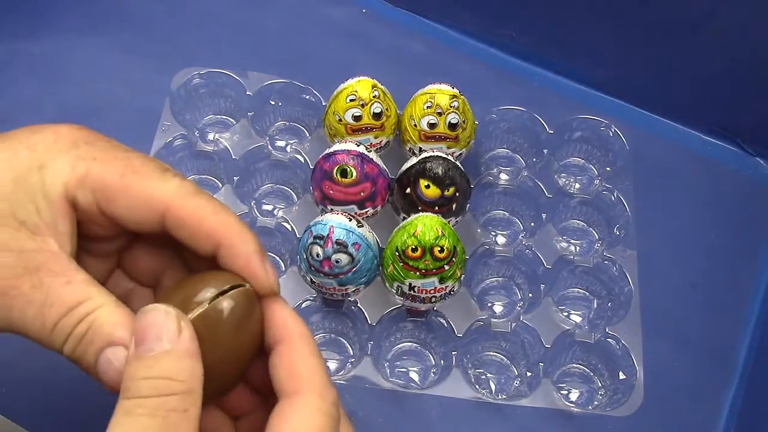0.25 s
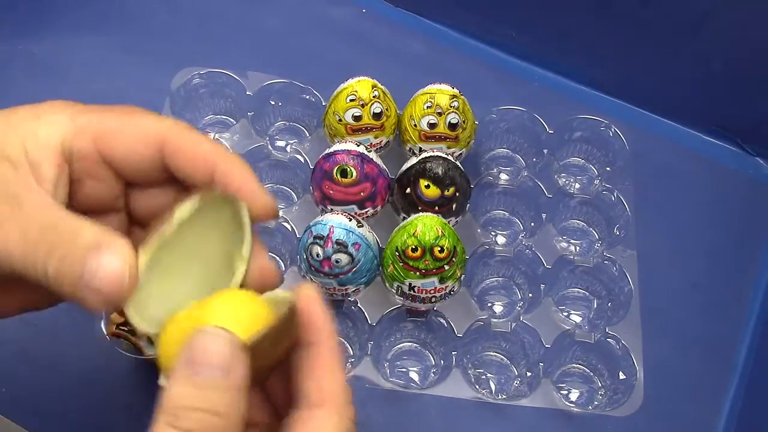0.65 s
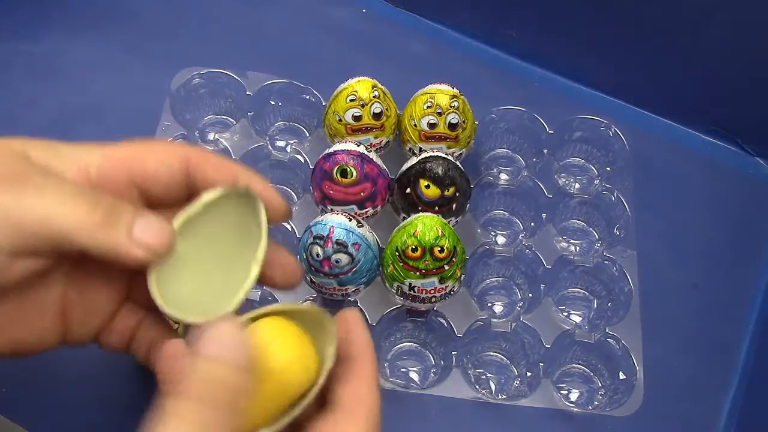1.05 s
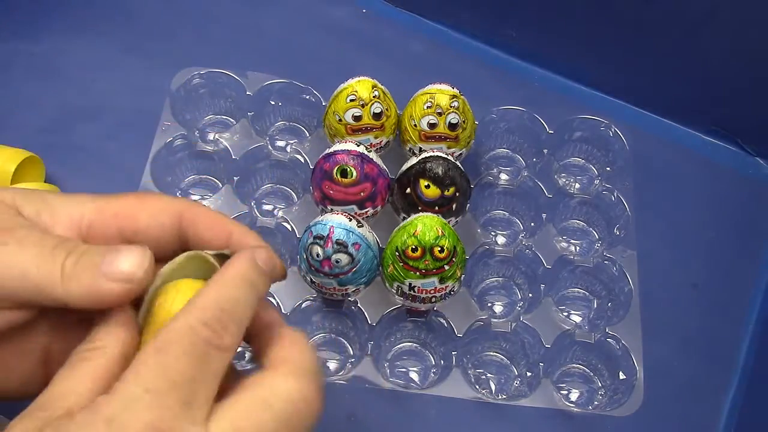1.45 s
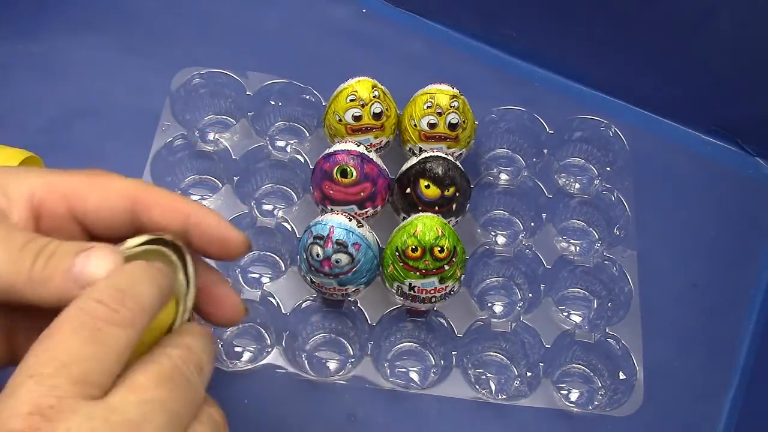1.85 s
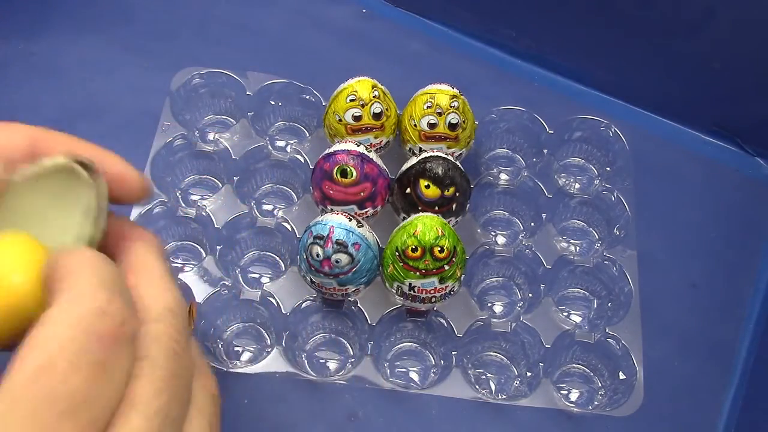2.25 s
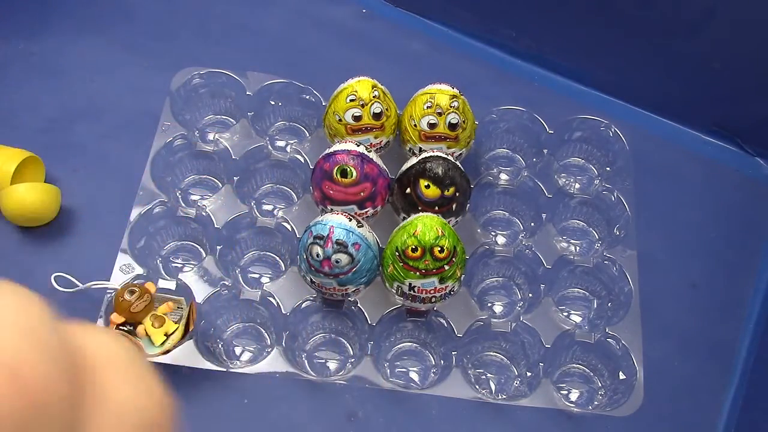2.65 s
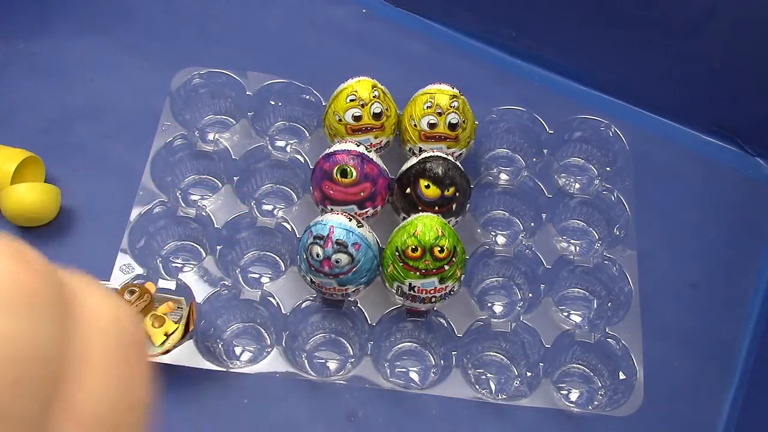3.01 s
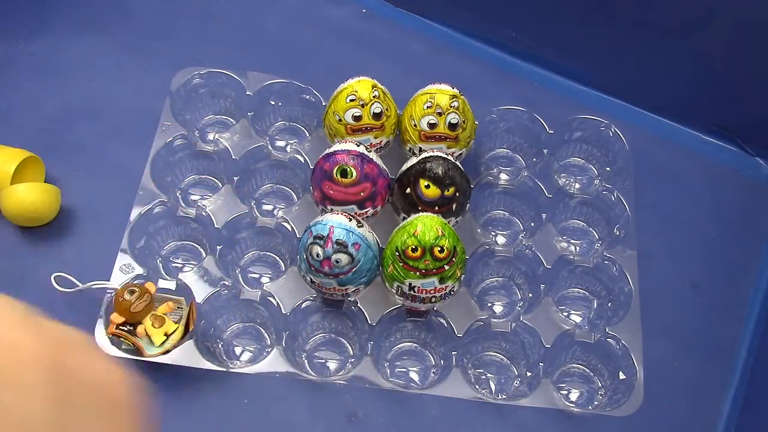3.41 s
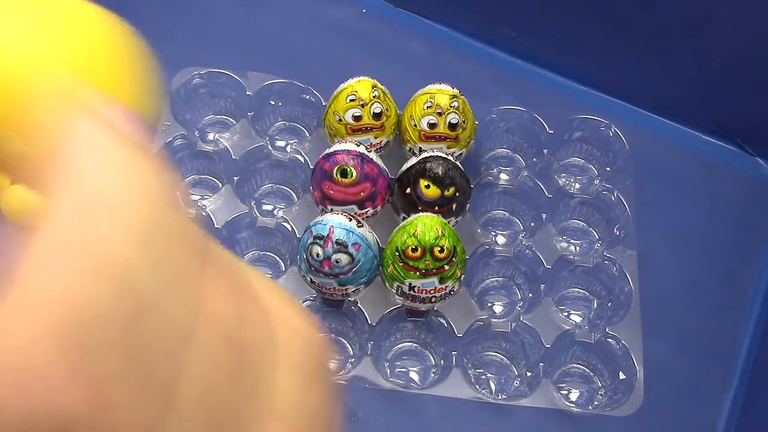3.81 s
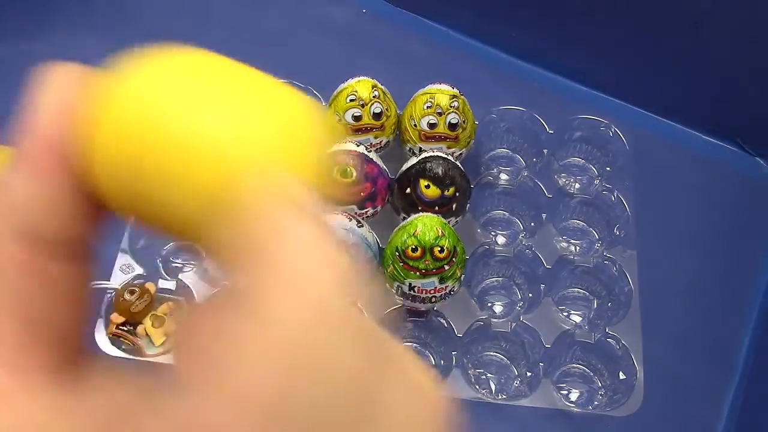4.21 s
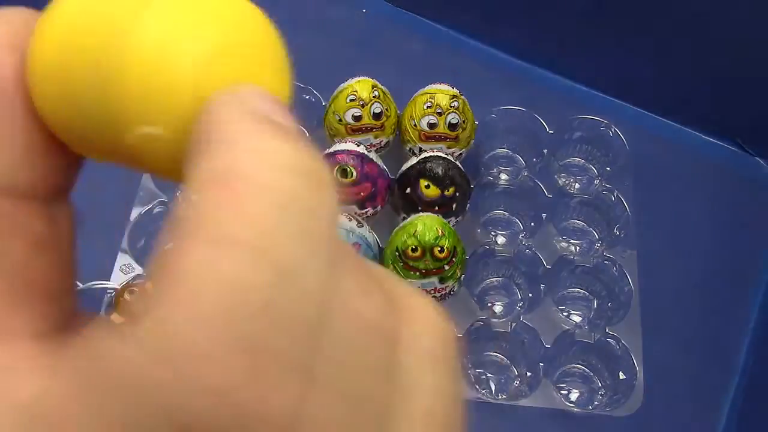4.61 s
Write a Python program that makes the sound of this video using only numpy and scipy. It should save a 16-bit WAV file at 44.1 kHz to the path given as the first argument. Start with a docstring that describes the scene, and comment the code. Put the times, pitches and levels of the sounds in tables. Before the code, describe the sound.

Close by in a quiet room, hands squeeze a hollow chocolate egg until it crackles and snaps in two. A second cluster of sharp cracks follows, then smaller clicks and faint rubbing as the halves shift and a plastic capsule is lifted out. The shell is set down a little further off with two knocks on the table, while a soft regular ticking runs through the second half.

```python
"""A hollow chocolate egg is squeezed until it creaks, crackles and snaps in two, close by in a quiet room.
Each crack is a volley of tiny breaks that rings the hollow and the wall; fingers and shell stick and slip.
The halves knock and slide, a plastic capsule is lifted out, and the shell is set down further off,
ringing the table top. A soft regular ticking runs through the second half."""
import sys
import numpy as np
from scipy import signal
from scipy.fft import rfft, irfft
from scipy.io import wavfile
from scipy.ndimage import uniform_filter1d

SR = 44100
rng = np.random.default_rng(int(sys.argv[2]) if len(sys.argv) > 2 else 0)


def log_audio(samples):
    """Write samples as a 16-bit WAV file to the path given in sys.argv[1]."""
    # one column per channel
    frames = np.atleast_2d(samples).T
    # limit to full scale, then quantise
    limited = np.clip(frames, -1, 1)
    pcm = np.round(limited * 32767).astype(np.int16)
    wavfile.write(sys.argv[1], SR, pcm)


N = 214546
CUTOFF_HZ = 16000
FFT_SIZE = 8192
BIN_HZ = np.maximum(np.fft.rfftfreq(FFT_SIZE, 1 / SR), 1)


def from_db(db):
    """Decibels to gain."""
    return 10 ** (np.asarray(db) / 20)


def at_hz(points, hz):
    """Interpolate rows of frequency in Hz and value on a log-frequency axis."""
    table_hz, values = np.transpose(points)
    return np.interp(np.log(np.maximum(hz, 1)), np.log(table_hz), values)


def add(track, start_s, sound):
    """Mix a sound into a track."""
    start = int(np.clip(round(start_s * SR), 0, N))
    track[start:start + len(sound)] += sound[:N - start]


def causal(x, gain):
    """Minimum-phase filter from a gain curve: nothing sounds early."""
    cepstrum = irfft(np.log(gain + 1e-9))
    cepstrum[1:FFT_SIZE // 2] *= 2
    cepstrum[FFT_SIZE // 2 + 1:] = 0
    response = irfft(np.exp(rfft(cepstrum)))[:FFT_SIZE // 2]
    return signal.fftconvolve(x, response)


def whitened(burst, span_hz):
    """Give a burst the broad spectrum of a unit click, keeping its fine ripples."""
    span_bins = max(int(span_hz * FFT_SIZE / SR), 1)
    power = uniform_filter1d(abs(rfft(burst, FFT_SIZE)) ** 2, span_bins)
    return causal(burst, 1 / np.sqrt(power + 1e-12))


def resonances(modes):
    """Peaks on a flat gain curve. Each mode: centre in Hz, nominal width in Hz, boost in dB."""
    peaks = [(from_db(abs(db)) ** 2 - 1) / (1 + ((BIN_HZ - hz) / (0.99 * width_hz)) ** 2) ** 2
             for hz, width_hz, db in modes]
    return np.sqrt(1 + sum(peaks))


def damped_colour(modes, levels_db, bass_db, top_db):
    """Gain curve of a damped object: body, mid, bright and air levels, with resonances on top."""
    # Frequencies in Hz of bass, body, mid, bright, air and top.
    anchors_hz = [120, 500, 1500, 4000, 9500, 16000]
    anchors_db = [levels_db[0] + bass_db, *levels_db, levels_db[-1]]
    broad_db = np.interp(np.log(BIN_HZ), np.log(anchors_hz), anchors_db)
    rolloff_db = top_db * np.minimum(BIN_HZ / CUTOFF_HZ, 1) ** 4
    return from_db(broad_db + rolloff_db) * resonances(modes)


def stereo_noise(length, coherence):
    """Bin frequencies and left and right white noise spectra. Each coherence row: Hz, value 0 to 1."""
    hz = np.fft.rfftfreq(length, 1 / SR)
    alike = np.clip(at_hz(coherence, hz), 0, 1)
    mid, side = rfft(rng.standard_normal((2, length)))
    return hz, np.sqrt((1 + alike) / 2) * mid + np.sqrt((1 - alike) / 2) * side * [[1], [-1]]


def room_tone(rms_db):
    """Low steady rumble with faint hiss."""
    # Each row: frequency in Hz, relative spectral density in dB.
    spectrum = [(15, -7), (40, 1.5), (60, -3.5), (100, 1.5), (150, 2.5), (310, 5), (700, -0.5), (1500, -5),
                (2200, -8), (4000, -12.5), (6700, -15), (12900, -24), (16000, -33)]
    # Each row: frequency in Hz, left-right coherence.
    coherence = [(40, 0.12), (120, 0.17), (300, 0.44), (1000, 0.65), (4000, 0.42), (12000, 1)]
    hz, spectra = stereo_noise(N, coherence)
    tone = irfft(spectra * from_db(at_hz(spectrum, hz)), N)
    return from_db(rms_db) * tone / tone.std()


def room_echo(x, build_s):
    """Diffuse reflections build up and die away band by band, the top treble first."""
    # Each row: frequency in Hz, t60 in seconds.
    decay_times = [(200, 0.5), (530, 0.43), (1500, 0.64), (3700, 0.54), (7000, 0.47), (13000, .25)]
    # Each row: frequency in Hz, echo gain in dB.
    echo_colour = [(150, 16), (500, 2.5), (1000, 0.5), (2000, 0.5), (4000, -1.5), (8000, -5), (14000, -5)]
    hz, spectra = stereo_noise(SR, coherence=[(200, 1.0), (1500, 0.98), (5000, 0.95), (12000, 0.59)])
    t, response = np.arange(SR) / SR, 0
    build = 1 - np.exp(-(t / build_s) ** 2)
    edges_hz = np.geomspace(80, 18000, 15)
    for low_hz, high_hz in zip(edges_hz, edges_hz[1:]):
        centre_hz = np.sqrt(low_hz * high_hz)
        envelope = build * from_db(-60 * t / at_hz(decay_times, centre_hz))
        band = irfft(spectra * ((hz >= low_hz) & (hz < high_hz)), SR)
        response += band * envelope / np.linalg.norm(envelope) * from_db(at_hz(echo_colour, centre_hz))
    return signal.fftconvolve(x[None], response, axes=1)[:, :N]


def two_ports(x, side_db):
    """Two microphone ports catch slightly different near reflections."""
    t = np.arange(FFT_SIZE // 16) / SR
    reflections = rng.standard_normal(len(t)) * t * np.exp(-t / 0.0015)
    side = signal.fftconvolve(x, reflections / np.linalg.norm(reflections))[:N]
    colour_db = at_hz([(300, 7), (1500, -2), (4000, 2.5), (12000, 5.5)], BIN_HZ)
    side = causal(side, from_db(colour_db))[:N]
    return x + from_db(side_db) * side * [[1], [-1]]


def ticks(start_s, period_s, scratch_s, pulse_hz, pulse_lag_s):
    """Each tick is a brief dry scratch ending in a soft low pulse; late ticks have a weaker rebound."""
    # Scratch resonances. Each row: centre in Hz, width in Hz, boost in dB.
    modes = [(406, 200, 12.5), (1550, 500, 6.5), (3760, 380, 13), (9300, 1230, 5)]
    # Each row: time in seconds, then pulse, scratch and air levels in dB.
    level_curves = [(2.59, -6.5, -16, -32), (2.94, -2.5, -23, -30.5), (3.29, -8, -26, -38),
                    (3.64, -9, -11.5, -27.5), (3.82, -9, -24, -40), (4.17, -3, -19, -23),
                    (4.35, -8, -17, -23), (4.52, -13, -17.5, -31), (4.7, -8, -9, -22)]
    rebound_from_s, rebound_lag_s, rebound_db = 3.95, 0.072, -10
    lead_s = 0.02
    t = np.arange(FFT_SIZE // 4) / SR - lead_s
    phase = 2 * np.pi * pulse_hz * (t - pulse_lag_s)
    pulse = -phase * np.exp(-phase ** 2 / 2)
    pulse /= abs(rfft(pulse, FFT_SIZE)).max()
    curve_s, *curves_db = np.transpose(level_curves)
    beats = [(s, 0) for s in np.arange(start_s, N / SR, period_s)]
    rebounds = [(s + rebound_lag_s, rebound_db) for s, _ in beats if s > rebound_from_s]
    out = np.zeros(N)
    for s, db in beats + rebounds:
        scratch = whitened(rng.standard_normal(len(t)) * np.exp(-abs(t) / scratch_s), span_hz=810)
        pulse_db, scratch_db, air_db = [db + np.interp(s, curve_s, curve) for curve in curves_db]
        levels_db = [scratch_db - 3.5, scratch_db - 2, scratch_db - 12, air_db]
        colour = damped_colour(modes, levels_db, bass_db=-12, top_db=-17)
        add(out, s - lead_s, causal(scratch, colour))
        add(out, s - lead_s, from_db(pulse_db) * pulse)
    return out


def grain_burst(t60_s, scatter_db, scatter_t60_s, grain_db):
    """A dying volley of tiny breaks or contacts, then its scatter from hands and table."""
    t = np.arange(FFT_SIZE // 2) / SR
    grains, sizes, scatter = rng.standard_normal((3, len(t)))
    volley = grains * from_db(grain_db * sizes - 60 * t / t60_s)
    scatter = scatter * from_db(-60 * t / scatter_t60_s) * (1 - np.exp(-t / 0.00295))
    return volley / np.linalg.norm(volley) + from_db(scatter_db) * scatter / np.linalg.norm(scatter)


def strike(near, send, start_s, burst, colour, send_db):
    """Add one blow to the near track and to the room send, where all directions blend to a smooth click."""
    click = signal.unit_impulse(len(burst))
    add(near, start_s, causal(burst, colour))
    add(send, start_s, from_db(send_db) * causal(click, colour))


def table_knocks():
    """Things set down further off ring the table top; returns near sound and room send."""
    # Each row: start in seconds, contact t60 in seconds, then body, mid, bright, air and room send in dB.
    blows = [(3.586, 0.024, -6.5, -7.5, -21.5, -38, 0), (3.8602, 0.035, 4.5, 3.5, -0.2, -14, 1.14)]
    # Table top resonances. Each row: centre in Hz, width in Hz, boost in dB.
    modes = [(215, 13, 11), (342, 20, 1.5), (547, 37, 7), (1000, 210, 7.5), (1475, 184, 10), (2750, 120, 6),
             (4400, 190, 3.5)]
    near, send = np.zeros((2, N))
    for start_s, t60_s, *levels_db, send_db in blows:
        burst = grain_burst(t60_s, scatter_db=0, scatter_t60_s=0.039, grain_db=-2.0)
        colour = damped_colour(modes, levels_db, bass_db=-24.5, top_db=-26)
        strike(near, send, start_s, whitened(burst, span_hz=300), colour, send_db)
    return near, send


def shell_rubs(grain_hz, grain_db, edge_db, peak_share):
    """Fingers and shell stick and slip in fine grains, swelling and fading with each stroke."""
    # Each row: start and length in seconds, relative level in dB, hiss offset in dB,
    # ring pitch in Hz, ring boost in dB.
    strokes = [ (0, 0.038, -44, -31, 1600, 9), (0.151, .16, -41.5, -29, 940, 11.5),
               (.409, .1, -43, -8.5, 1970, 11.5), (0.631, 0.081, -33, -7, 3370, 3),
               (.75, 0.078, -45.5, -10, 3190, 2), (1.088, .1, -44, -3.5, 1300, 7),
               (1.172, .13, -42, -22, 900, 10.5), (1.307, 0.029, -40, 4, 3000, 6),
               (1.575, 0.15, -38.5, -4, 1950, 3), (1.786, 0.071, -38, -11.5, 3450, 6.5),
               (1.969, 0.034, -36.5, -9, 3300, 14), (1.97, 0.53, -42.5, -22, 484, 14),
               (2.038, 0.1, -38.5, -8, 2500, 16), (2.089, 0.064, -36.5, 2, 2140, 22.5),
               (2.102, 0.79, -40, -15.5, 470, 11), (3.009, 0.13, -49, -7.5, 2200, 8),
               (3.159, .19, -39.5, -23, 2400, 2), (3.582, 0.13, -38.5, -21, 545, 7),
               (3.811, 0.073, -37.5, -30, 1450, 7.5), (4.037, 0.37, -41, -33, 1490, 8)]
    hiss_mode = (9400, 800, 4.2)
    out = np.zeros(N)
    for start_s, length_s, db, hiss_db, ring_hz, ring_db in strokes:
        t = np.arange(int(length_s * SR)) / SR
        noise, sizes = rng.standard_normal((2, 2 * SR))[:, :len(t)]
        grip = from_db(grain_db * np.interp(t * grain_hz, np.arange(len(t)), sizes))
        slips = noise * grip / np.sqrt(np.mean(grip ** 2))
        swell_db = np.interp(t / length_s, [0, peak_share, 1], [edge_db, 0, edge_db])
        envelope = from_db(swell_db) * signal.windows.tukey(len(t), 0.15)
        body_db = -9 - 0.31 * hiss_db   # soft skin hisses less and hums more
        levels_db = db + np.array([body_db, 0, -4, hiss_db])
        modes = [(ring_hz, 0.12 * ring_hz, ring_db), hiss_mode]
        colour = damped_colour(modes, levels_db, bass_db=-16.5, top_db=-19)
        add(out, start_s, causal(slips * envelope, colour))
    return out


def shell_cracks():
    """Each fracture or knock rings the hollow and the chocolate wall; returns near sound and room send."""
    # Each row: start in seconds, fracture t60 in seconds, level in dB, treble offset in dB,
    # hollow ring in Hz, then hollow boost, wall boost and room send in dB.
    fractures = [ (0.0549, 0.017, 2.5, -19, 652, 14, 2.5, -9.5),
                 (.263, 0.0036, -12.5, -17.5, 1310, 11, 2, -8.5),
                 (.4353, 0.012, -15, -3.5, 2090, 1, 6.5, -22), (.5177, .0079, -20, -2.5, 2290, 9, 2, -22),
                 (.57, 0.014, -15, -2, 2330, 11.5, 14, -10),
                 (0.5965, 0.0023, -14.5, -9, 2300, 11, 8.5, -13.5),
                 (.637, 0.015, 1, -7.5, 3700, 9, -5, -10), (.675, .008, -9, -8, 880, 12.5, -0.5, -8.5),
                 (.693, .01, -13, 1, 2310, 5, 3, -12), (.805, .012, -16, -5, 3000, 6.5, 5, -9.5),
                 (0.8326, 0.0058, -2.5, -12.5, 4370, 10.5, 1, -6), (.8794, .003, 6.5, 5, 3810, 9, 4.5, -31),
                 (.8799, 0.0084, 15.5, -1, 5640, 4.5, 6, -5.5),
                 (1.3035, 0.0076, 16.5, -30, 2310, 14.5, 18, -9.5),
                 (1.3419, 0.0022, -2, -8.5, 2130, 8, 10, -1.5),
                 (1.348, 0.001, -5.5, 5, 2100, 13, 10.5, -25),
                 (1.3532, 0.0045, 18, -3.5, 2080, 10.5, 3.5, -9),
                 (1.3556, 0.0064, 9.5, 0.5, 2060, 16, 3.5, -5.3), (1.5017, 0.012, 6, -3.5, 2070, 11, 2, -7),
                 (2.0076, 0.012, -13.5, -7, 2150, 9, 9, -0.5), (2.255, 0.008, -3, -6, 2096, 21.5, 3.5, -7),
                 (2.328, 0.0046, -9.5, -18, 1830, 11, 11, -5),
                 (2.3446, 0.0044, -8.5, -4.5, 6170, 9, 3, -25),
                 (2.3917, 0.0061, -7.5, -7.5, 1480, 4, -3, -18), (2.5841, .011, -15.5, -5, 4240, 1, -1, 0),
                 (3.293, 0.03, -13, -12, 2400, 13, 13.5, 0.5)]
    # Pitched by the grip. Each row: centre and width as shares of the ring pitch, share of the boost.
    hollow_modes = [(0.99, 0.099, 0.99), (0.907, 0.056, .85), (0.636, 0.038, 0.46)]
    wall_hz, wall_width_hz = 3216, 330
    cup_mode = (540, 135, 3.7)   # air cupped between the hands
    near, send = np.zeros((2, N))
    for start_s, t60_s, db, treble_db, ring_hz, ring_db, wall_db, send_db in fractures:
        burst = grain_burst(t60_s, scatter_db=-6.5, scatter_t60_s=0.04, grain_db=-1.0)
        modes = [(centre * ring_hz, width * ring_hz, boost * ring_db)
                 for centre, width, boost in hollow_modes]
        modes += [(wall_hz, wall_width_hz, wall_db), cup_mode]
        thud_db = -8.5 + 0.27 * db
        levels_db = [thud_db, db, db + treble_db, db + treble_db - 4.5]
        colour = damped_colour(modes, levels_db, bass_db=-19.5, top_db=-25.5)
        strike(near, send, start_s, whitened(burst, span_hz=520), colour, send_db)
    return near, send


def scene():
    """Near sounds and their echo, coloured by table top and microphone, over the room tone."""
    # Each row: frequency in Hz, gain in dB.
    near_colour = [(80, -2.5), (130, 2), (250, -2), (330, 1), (600, -1), (780, -2), (1100, 0), (2000, -0.5),
                   (2550, -0.5), (3800, 0.5), (4800, 0), (7500, -0.5), (10500, 1.5), (16000, -3)]
    struck, send = np.add(shell_cracks(), table_knocks())
    rubbing = from_db(-4.5) * shell_rubs(grain_hz=900, grain_db=2.5, edge_db=-13.0, peak_share=0.41)
    ticking = ticks(start_s=2.589, period_s=0.1757, scratch_s=0.0043, pulse_hz=225, pulse_lag_s=0.003)
    echo = room_echo(send + from_db(-5.5) * rubbing + from_db(-20.5) * ticking, build_s=0.006)
    heard = two_ports(struck + rubbing + ticking, side_db=-22.5) + echo
    colour = from_db(at_hz(near_colour, BIN_HZ))
    coloured = np.array([causal(channel, colour)[:N] for channel in heard])
    return coloured + room_tone(rms_db=-56.5)


def record(dry):
    """Clip at full scale, then cut deep bass and top."""
    highpass = signal.butter(2, 75, "high", fs=SR, output="sos")
    lowpass = signal.cheby2(16, 70, CUTOFF_HZ + 600, fs=SR, output="sos")
    return signal.sosfilt(lowpass, signal.sosfilt(highpass, np.clip(dry, -1, 1)))


dry = scene()
out = record(dry)
log_audio(out)
```